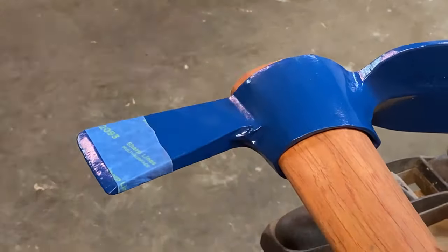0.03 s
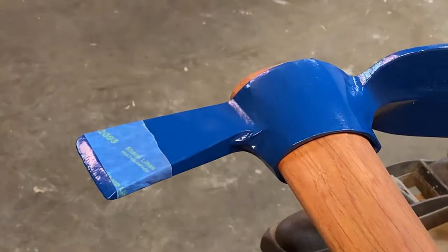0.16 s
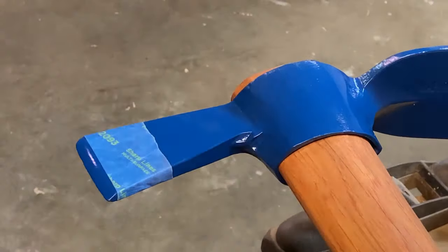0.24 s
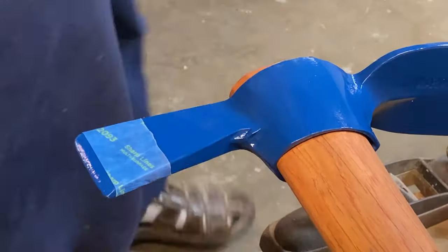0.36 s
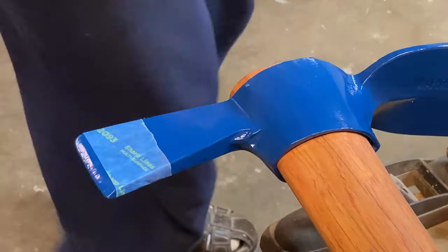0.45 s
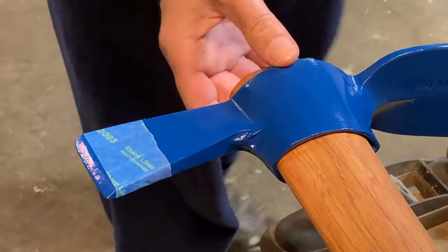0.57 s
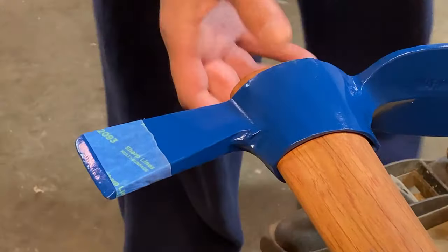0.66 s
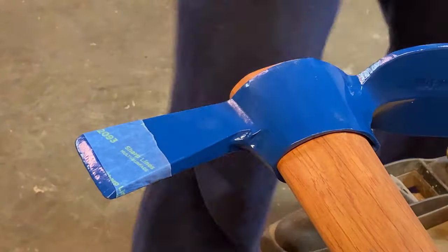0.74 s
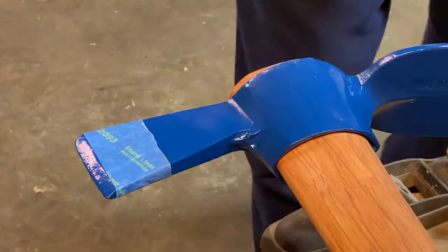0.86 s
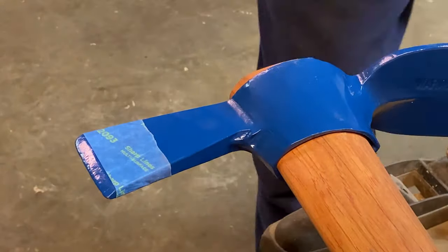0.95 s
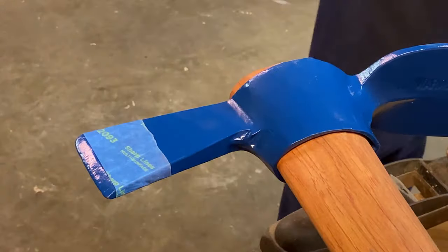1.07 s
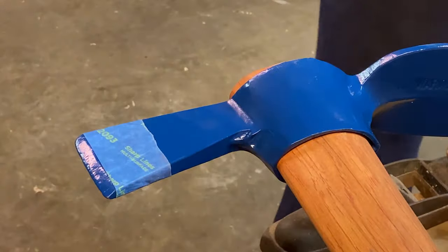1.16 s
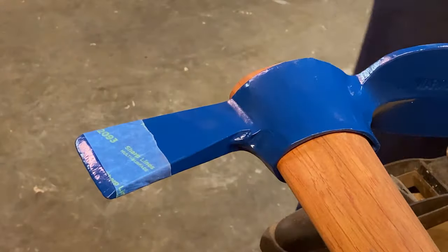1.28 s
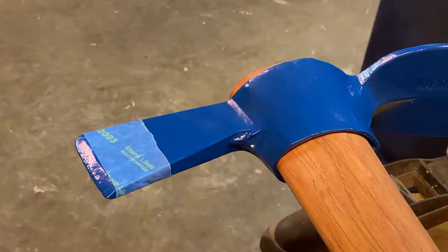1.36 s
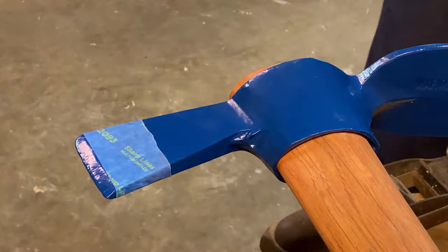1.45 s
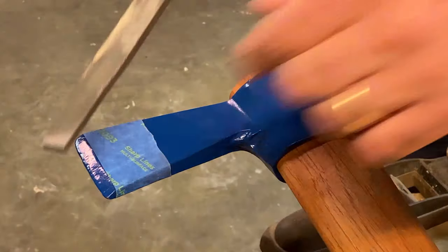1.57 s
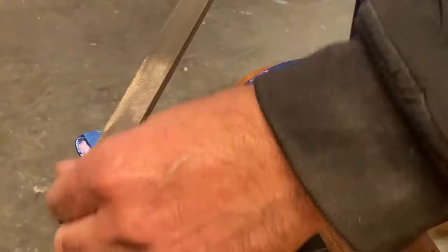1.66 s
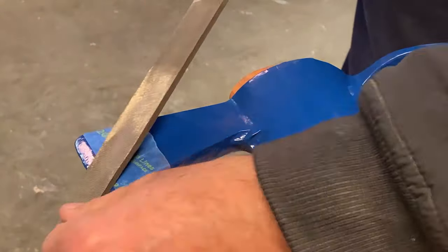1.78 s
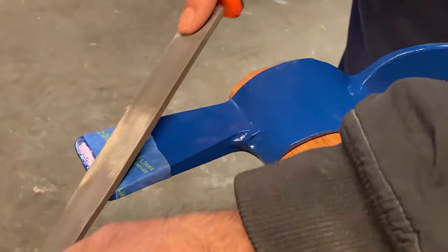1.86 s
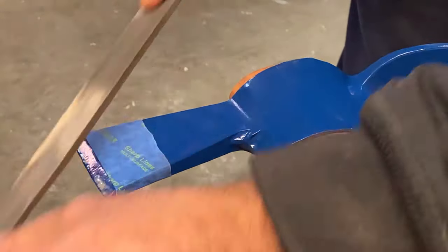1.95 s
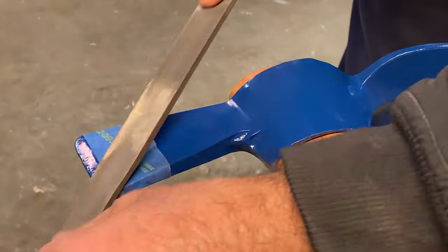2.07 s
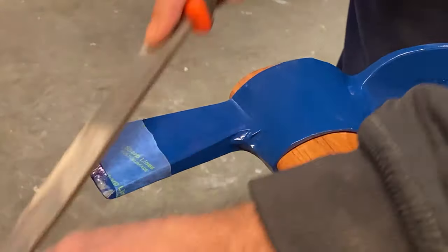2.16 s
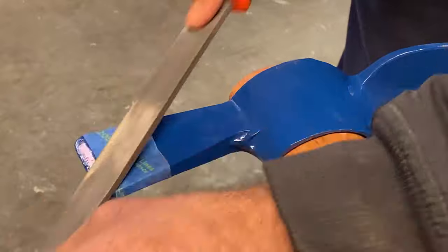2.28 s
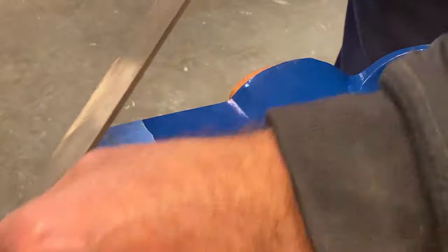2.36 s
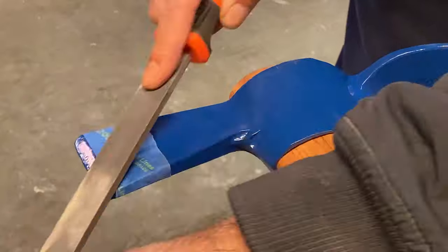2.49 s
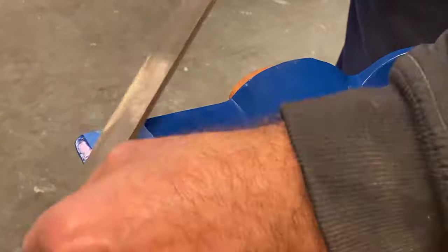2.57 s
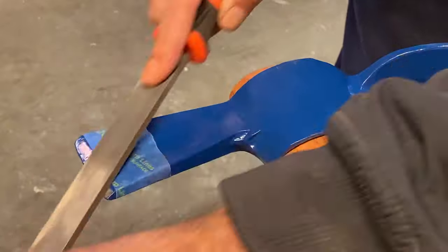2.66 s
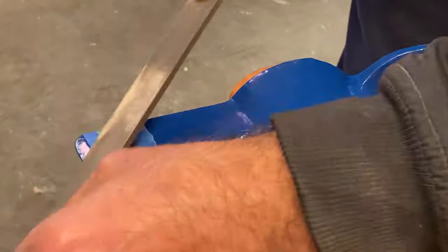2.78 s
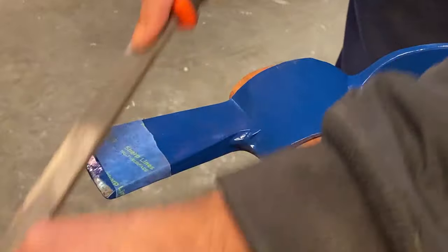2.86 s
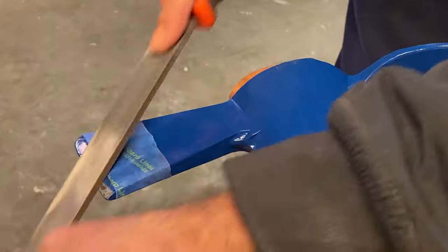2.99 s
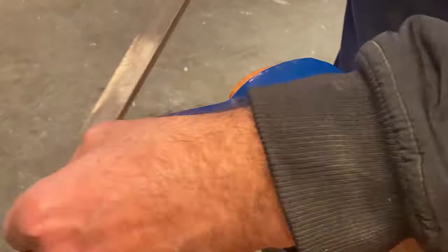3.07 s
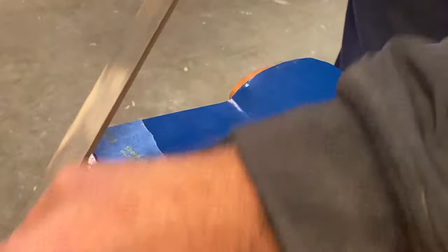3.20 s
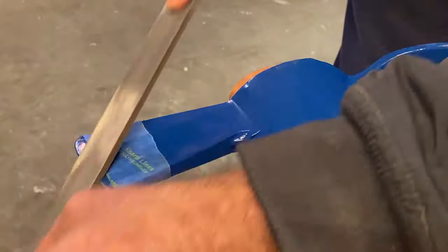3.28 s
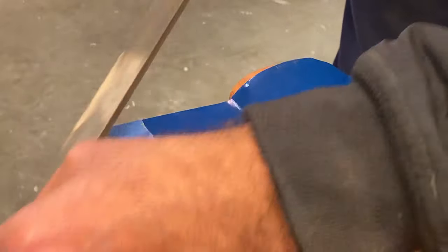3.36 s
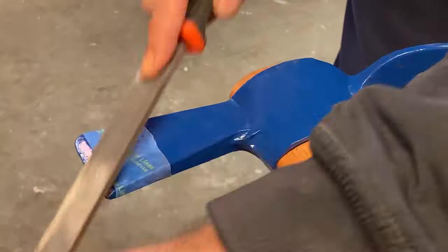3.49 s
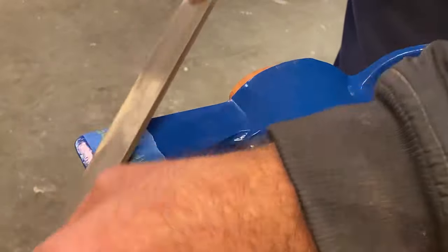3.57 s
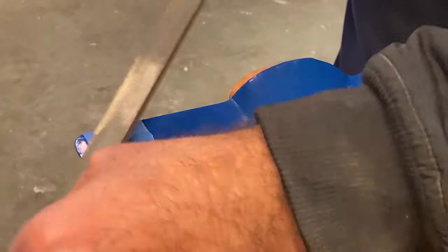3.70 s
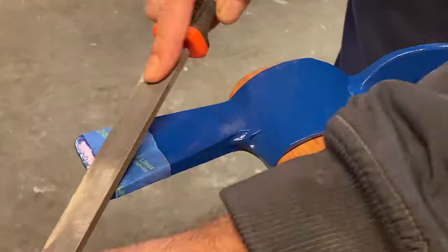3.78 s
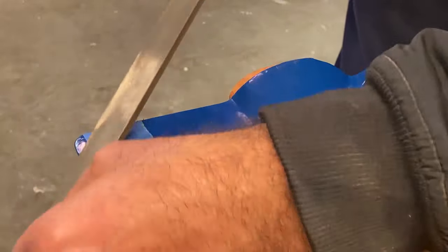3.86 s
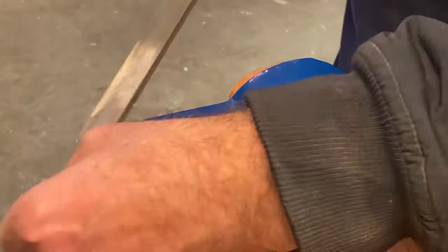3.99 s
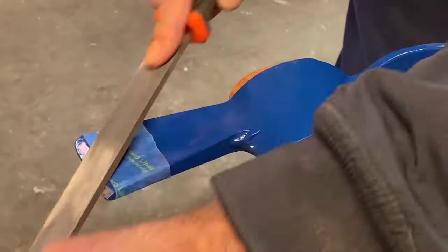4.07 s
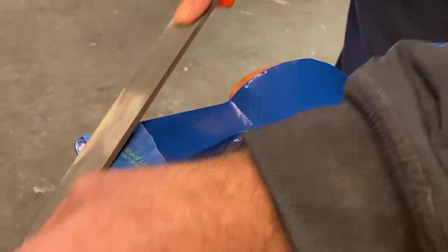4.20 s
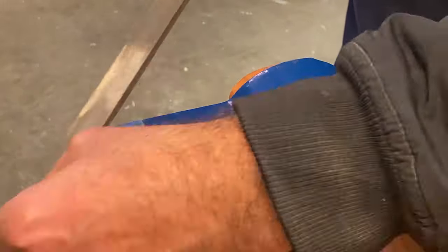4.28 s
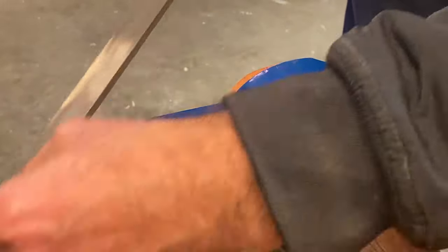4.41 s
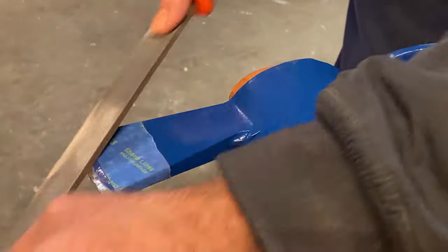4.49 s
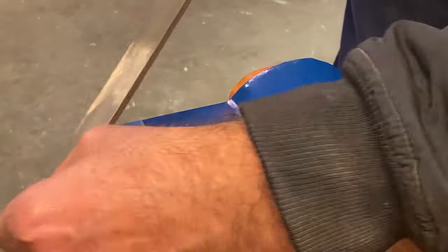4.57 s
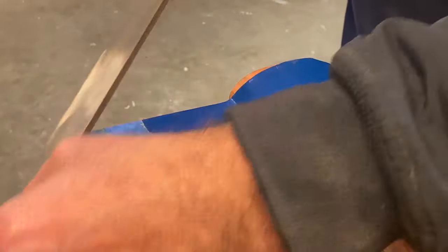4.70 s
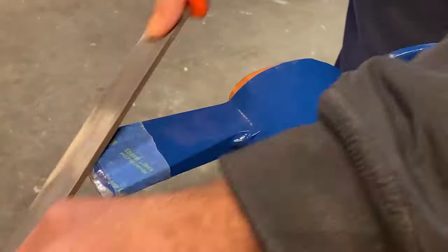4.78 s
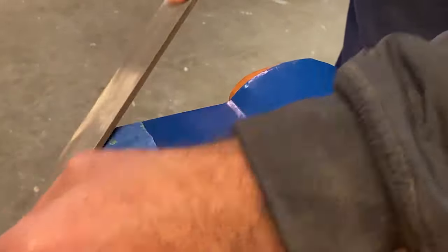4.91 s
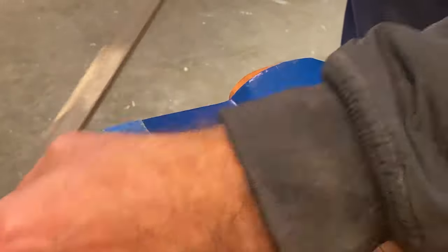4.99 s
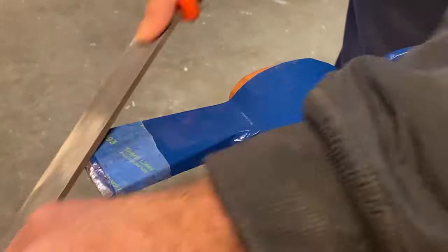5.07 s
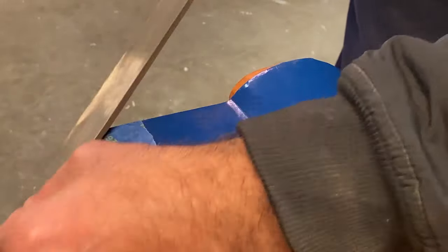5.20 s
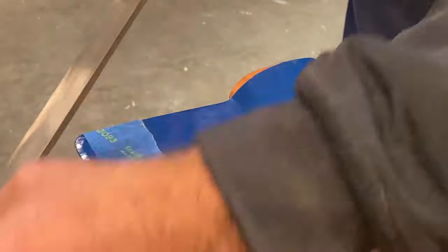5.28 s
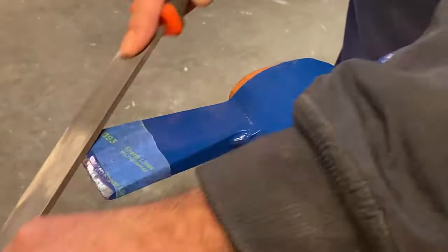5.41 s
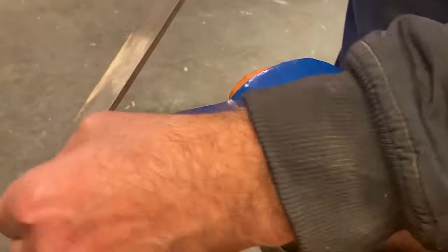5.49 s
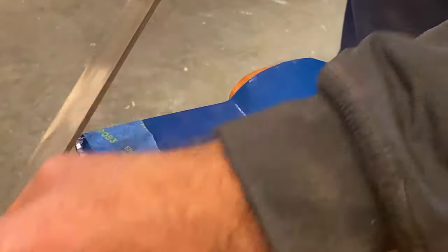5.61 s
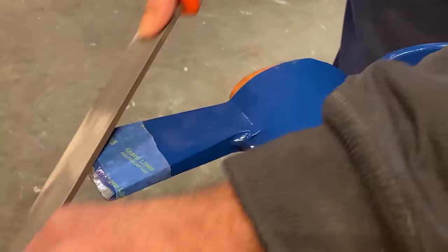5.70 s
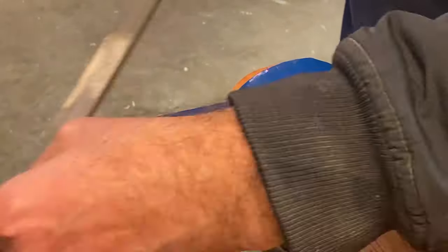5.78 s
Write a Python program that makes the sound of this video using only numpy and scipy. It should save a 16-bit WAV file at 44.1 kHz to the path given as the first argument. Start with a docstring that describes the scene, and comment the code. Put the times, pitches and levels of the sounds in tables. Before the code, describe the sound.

Close stereo microphone in a quiet workshop. For nearly two seconds work clothes swish softly, with scattered footstep bumps and dull knocks. Then a hand file meets a steel tool head: a few tentative touches, then a steady run of about six bright, gritty rasps a second, each starting with a hard metal clack. A sleeve brushes faintly between strokes. Short, faint room tail, low still air.

```python
"""Work clothes rustle first as someone steps up, with dull bumps, beside two close microphone ports.
Then a hand file dresses the steel edge of a mattock in a workshop, about six strokes a second.
Each stroke is noise and ticks through steel modes: a clack on landing, then the rasp of toothed catches
and tearing steel, while friction makes the head thrum and squeal. A sleeve, made of shaped noise, brushes
on each way back. Near scatter, a short room tail and still workshop air, all from noise, lie behind."""
import sys
import numpy as np
from scipy import signal
from scipy.fft import rfft, irfft, next_fast_len
from scipy.io import wavfile
from scipy.ndimage import map_coordinates

SR = 44100
rng = np.random.default_rng(int(sys.argv[2]) if len(sys.argv) > 2 else 0)


def bounce(signal):
    """Save signal as a 16-bit WAV file at the path given by the first command-line argument."""
    frames = np.transpose(np.atleast_2d(signal))
    limited = np.clip(frames, -1, 1)
    pcm = np.round(limited * 32767).astype(np.int16)
    wavfile.write(sys.argv[1], SR, pcm)


N = 257984  # length [samples]
EDGE_HZ = 15900  # upper band limit of the microphone
TAPS = 8192  # length of an impulse response [samples]
HZ = np.fft.rfftfreq(TAPS, 1 / SR)
TREBLE = (HZ > 2000) & (HZ < EDGE_HZ)


def amp(db):
    """Decibels to gain."""
    return 10 ** (np.asarray(db) / 20)


def evened(x):
    """Scales to rms 1."""
    return x / np.sqrt(np.mean(x ** 2) + 1e-20)


def read(points, hz):
    """Reads a table on a log-frequency axis."""
    f, value = np.transpose(points)
    return np.interp(np.log(hz + 1), np.log(f + 1), value)


def add(mix, s, sound):
    """Mixes a sound in at time s."""
    part = mix[max(round(s * SR), 0):][:len(sound)]
    part += sound[:len(part)]


def wander(size, hz):
    """Random line of rms 1 that takes a new value hz times a second, with straight slopes between."""
    at = np.arange(size) * hz / SR
    return evened(np.interp(at, np.arange(size), rng.standard_normal(size)))


def causal(gain, lag_s, lag_hz=800):
    """The impulse response with this gain curve; bending waves are slow, so the lows arrive later."""
    gain = gain / (1 + (HZ / 18500) ** 40)
    # folding the cepstrum gives minimum phase
    cepstrum = irfft(np.log(np.maximum(gain, 1e-5 * gain.max())))
    cepstrum[1:TAPS // 2] *= 2
    cepstrum[TAPS // 2 + 1:] = 0
    delay_s = lag_s / (1 + (HZ / lag_hz) ** 2)
    lag_phase = 2 * np.pi * np.cumsum(delay_s) * HZ[1]
    response = irfft(np.exp(rfft(cepstrum) - 1j * lag_phase))
    return response * np.linspace(1, 0, TAPS) ** .25


# where the file works along the edge:
# (time [s], place of landing [about 0-1], place of the bite [about 0-1])
EDGE_PLACES = [(1.8, 0, 0), (2.7, 0, .05), (3.25, 0.5, 0.66), (3.8, 0.24, .1), (4.25, 0.96, 0.74),
               (5.6, 0.97, 1.06)]


def place_at(s):
    """Where along the edge the file lands and where it bites, at time s."""
    times, landing, bite = np.transpose(EDGE_PLACES)
    return np.interp(s, times, landing), np.interp(s, times, bite)


# modes of head and file over a flat response of 0 dB:
# (frequency [Hz], width [Hz], level at place 0 [dB], level at place 1 [dB])
STEEL_MODES = [(451.5, 16, 16, 13.5), (538.5, 17, 22.5, 24), (836, 61, 15, 18), (905, 60, 13.5, 16.5),
               (1092, 31, 10.5, 10.5), (1265, 42, 14, 17), (1425, 80, 15.5, 13), (2124, 124, 4, 4),
               (2652, 42, 13, 12), (3535, 87, 14.5, 5), (3816, 64, 15.5, 12), (4152, 77, 19, 14),
               (4395, 116, 11, 8), (5070, 116, 7.5, 10.5), (5430, 100, -1, 3), (5510, 93, 8.5, 3.5),
               (6150, 74, 4, 7), (6503, 84, 7.5, 13), (7370, 120, -3, 15), (7410, 95, 11, 16.5),
               (7562, 68, 11.5, 15), (7710, 120, 13.5, 18.5), (8370, 105, 14.5, 18), (8430, 68, 2, 13),
               (8920, 160, 8, 9), (9294, 130, 16.5, 11.5), (9480, 104, 14, 7), (11450, 94, 2, 2),
               (12450, 150, 9, 6), (12776, 79, -4, -1), (13500, 69, 3, 8)]


def steel(colour, place, tilt_db, lag_s=.0065, vary_db=1.5):
    """Response of head and file; the place of contact and the chance of each grip decide which modes speak."""
    hz, width, near_db, far_db = np.transpose(STEEL_MODES)
    mode_db = near_db + place * (far_db - near_db) + vary_db * rng.standard_normal(len(hz))
    peaks = amp(mode_db) ** 2 / (1 + (2 * (HZ[:, None] - hz) / width) ** 2)
    octaves = np.log2(np.maximum(HZ, 350) / 4000)
    gain = np.sqrt(1 + peaks.sum(1)) * amp(read(colour, HZ) + tilt_db * octaves)
    gain = gain * HZ ** 2 / (HZ ** 2 + 90 ** 2)  # so small a body radiates no deep bass
    return causal(gain / np.sqrt(np.mean(gain ** 2 * TREBLE)), lag_s)


# file strokes: (time of landing [s], clack level over its first 10 ms [dB], time of the hardest bite [s],
# rasp level before its trim [dB], time to swell by 10 dB [s], rasp tilt [dB per octave])
FILE_STROKES = [(1.7998, -30.5, 1.82, -62, .02, -4), (1.9451, -45.5, 2.003, -50, .05, -1.9),
                (2.1254, -50, 2.217, -37, .026, 2), (2.3301, -27, 2.399, -39.5, .033, -0.6),
                (2.499, -26, 2.574, -31, .02, 1.3), (2.6793, -31, 2.743, -33.5, .024, 0.95),
                (2.8619, -30.5, 2.923, -34, .035, 0), (3.0244, -29.5, 3.093, -34, .029, 0),
                (3.182, -34, 3.245, -31, .033, 0.1), (3.341, -39.5, 3.405, -27, .042, 0.37),
                (3.4933, -22, 3.556, -30.5, .035, -0.5), (3.6501, -28.5, 3.706, -31.5, .034, 0.4),
                (3.805, -24.5, 3.864, -33, .037, 0), (3.9521, -27.5, 4.012, -32, .036, 0.3),
                (4.1018, -32, 4.169, -31, .033, 0.24), (4.245, -27.5, 4.32, -35, .044, -1.35),
                (4.3953, -27.5, 4.449, -34, .032, -0.47), (4.5419, -26.5, 4.601, -35, .027, -1.13),
                (4.6758, -27, 4.738, -33.5, .025, -1), (4.8266, -26, 4.888, -31, .025, -0.6),
                (4.9726, -25, 5.028, -29, .023, 0.45), (5.1144, -22, 5.173, -31, .033, -.2),
                (5.2739, -21.5, 5.331, -33, .029, -0.8), (5.4274, -22.5, 5.486, -33, .033, -.1),
                (5.587, -23.5, 5.653, -30.5, .03, .5), (5.7387, -26.5, 5.798, -30, .022, -0.6)]
# broad colour of a landing: (frequency [Hz], level [dB])
LANDING_COLOUR = [(100, -39.5), (170, -21), (270, -20), (400, -19.5), (650, -29), (1000, -24.5),
                  (1900, -23), (3000, -16), (4200, -10), (6000, -6.5), (8000, -10), (10500, -7.5),
                  (14500, -4.5), (15800, -2.5)]
# landings softer than FIRM_DB are duller, firmer ones brighter: DULLING [dB per octave for each dB]
FIRM_DB, DULLING = -26, .24


def clacks(chatter=0.81, chatter_s=.0013, skid=0.22, skid_s=0.014, skid_hz=2600):
    """Each landing is a hard tick, a millisecond of chatter and a duller skid of the teeth."""
    out, t = np.zeros(N), np.arange(3072) / SR
    soft = np.exp(-2 * np.pi * skid_hz / SR)
    for s, db, *_ in FILE_STROKES:
        bounces, drag = rng.standard_normal((2, len(t)))
        force = chatter * bounces * np.exp(-t / chatter_s)
        force += skid * signal.lfilter([1 - soft], [1, -soft], drag) * np.exp(-t / skid_s)
        force[0] += 1  # the tick
        response = steel(LANDING_COLOUR, place_at(s)[0], DULLING * (db - FIRM_DB))
        ring = signal.fftconvolve(force, response)
        add(out, s, amp(db) * ring / np.sqrt(np.mean(ring[:SR // 100] ** 2)))
    return out


# broad colour of the cutting teeth: (frequency [Hz], level [dB])
TEETH_COLOUR = [(100, -37.5), (170, -12.5), (270, -12), (380, -3), (490, -12), (650, -17), (1000, -14.5),
                (1900, -10), (3000, -7), (4200, -11.5), (6000, -8), (8000, -10), (10500, -8.5),
                (14500, -1.5), (15800, -8)]
FADE_S = .024  # after the bite the rasp's drive falls by 10 dB in this time


def rasps(level_db=-1, teeth_hz=2300, slowing_s=.09, regular=0.48, grit=0.77, judder=0.44,
          judder_hz=535, uneven_db=1.52, swell_shape=1.37, fade_shape=2.34):
    """Rows of teeth catch the edge ever slower as the push ends; the thrumming head makes them judder."""
    out = np.zeros(N)
    since_start = np.arange(SR // 5) / SR
    size = len(since_start)
    for start, _, s, db, swell_s, tilt_db in FILE_STROKES:
        t = start + since_start - s  # time from the hardest bite
        swell = abs(t / swell_s) ** swell_shape
        fade = abs(t / FADE_S) ** fade_shape
        pressure = amp(-10 * np.where(t < 0, swell, fade))
        rate_hz = teeth_hz * np.clip(1 - t / slowing_s, .3, 1.2) * (1 + .08 * wander(size, 400))
        caught = np.diff(np.floor(np.cumsum(rate_hz) / SR), prepend=0)
        # nearly even rows give a faint falling zip, their unequal bites the grain
        zip_ = regular * (caught - rate_hz / SR)
        teeth = evened(zip_ + caught * rng.uniform(-1.05, 1, size))
        chips = grit * rng.standard_normal(size)  # steel tears between the catches
        turns = np.cumsum(judder_hz * (1 + 0.1187 * wander(size, 201))) / SR
        bite = (1 + judder * np.sin(2 * np.pi * turns)) * amp(uneven_db * wander(size, 225.8))
        force = evened((teeth + chips) * bite) * pressure
        response = steel(TEETH_COLOUR, place_at(s)[1], tilt_db)
        add(out, start, amp(db + level_db) * signal.fftconvolve(force, response))
    return out


def sliding(x, patchy_db=2.6, patch_hz=450, patch_s=.016):
    """The sliding contact passes nodes of the file's bending waves, so bands swell and sink in patches."""
    hz, t, z = signal.stft(x, SR, nperseg=512, noverlap=384)
    chance = rng.standard_normal(z.shape)
    grid = np.meshgrid(hz / patch_hz, t / patch_s, indexing="ij")
    patches = evened(map_coordinates(chance, grid, order=1, mode="wrap"))
    z = z * amp(patchy_db * patches * (hz / (hz + 700))[:, None])  # weaker in the bass
    patchy = signal.istft(z, SR, nperseg=512, noverlap=384)[1][:N]
    return evened(patchy) * np.std(x)


def resonate(x, hz, width):
    """A steep resonance of gain 1 that can follow a moving pitch."""
    turn = np.exp(2j * np.pi * np.cumsum(hz * np.ones(len(x))) / SR)
    r = np.exp(-np.pi * width / SR)
    once = signal.lfilter([1 - r], [1, -r], x / turn)
    return 2 * (turn * signal.lfilter([1 - r], [1, -r], once)).real


# resonances set going by friction in the hard middle of a push; levels are against the untrimmed rasp,
# before its tilt: (frequency [Hz], width [Hz], level at place 0 [dB], level at place 1 [dB],
# time to fade by 10 dB either side, sign ignored [s], time after the bite [s])
FRICTION_TONES = [(450.8, 16, -18.5, -20.5, .05, .008), (536.8, 20, -9.5, -9, 0.02, 0.00198),
                  (7720, 700, -9, -0.5, -0.01, 0.0024)]


def singing(waver=.008, waver_hz=70):
    """Hard biting makes the head thrum on its handle and the edge squeal; bright pushes thrum less."""
    out, t = np.zeros(N), np.arange(-SR // 8, SR // 8) / SR
    for _, _, s, db, _, tilt_db in FILE_STROKES:
        for hz, width, near_db, far_db, fade_s, after_s in FRICTION_TONES:
            noise = rng.standard_normal(len(t))
            tone = resonate(noise, hz * (1 + waver * wander(len(t), waver_hz)), width)
            swell = amp(-10 * (t / fade_s) ** 2)
            place_db = near_db + place_at(s)[1] * (far_db - near_db)
            level_db = db + place_db + tilt_db * np.log2(hz / 4000)
            sound = evened(tone * swell) * np.sqrt(np.mean(swell ** 2))
            add(out, s + after_s + t[0], amp(level_db) * sound)
    return out


# how the ports hear the near blade: (frequency [Hz], left minus right level [dB])
BLADE_BALANCE = [(200, -1), (500, -1.1), (1100, 2), (2500, -5), (3700, 3), (4300, -7), (5200, 2), (6800, 0),
                 (8200, 1), (8900, 7.5), (9800, 1), (12000, 2.5), (13000, 5.5), (15000, 6.5)]
# and (frequency [Hz], phase by which left leads [rad])
BLADE_PHASE = [(100, 0.5), (1200, 0.27), (2500, -1.8), (3500, -1.5), (4200, -1.85), (5200, 1), (6200, -2.3),
               (7000, -0.2), (7800, -1.47), (9900, -1.5), (10500, 1.5), (12500, 1.3), (13500, 3),
               (16000, 1.5)]


def ports(x):
    """The near blade reaches the two microphone ports with different level and phase."""
    size = next_fast_len(N + TAPS)
    hz = np.fft.rfftfreq(size, 1 / SR)
    lean = amp(read(BLADE_BALANCE, hz) / 2) * np.exp(.5j * read(BLADE_PHASE, hz))
    pair = np.array([lean, 1 / lean])
    pair = pair / np.sqrt(np.mean(abs(pair) ** 2, 0))
    return irfft(rfft(x, size) * pair, size)[:, :N]


# steps, handling bumps and, at 2.004 s, a short scrape: (time [s], peak level before its trim [dB],
# resonance [Hz], bass shading before low_db is added [dB])
BUMPS_AND_SCRAPE = [(0.363, -46, 660, -16), (0.46, -47, 400, -7), (0.484, -39.5, 2880, -14),
                    (0.503, -43, 388, -29), (0.578, -42.5, 420, -13), (0.592, -41.5, 3040, -16),
                    (0.793, -30.5, 2380, -14), (0.891, -43.5, 1490, -11.5), (1.043, -49, 386, -12),
                    (1.106, -52.5, 428, -6), (1.127, -51, 412, -8), (1.326, -46.5, 816, -4),
                    (1.401, -39.5, 840, -9), (1.412, -28, 810, -10.5), (1.433, -43, 400, 1),
                    (1.516, -44, 405, -14), (1.944, -28, 840, -12.5), (2.004, -35, 1500, -16)]
# their shared colour: (frequency [Hz], level [dB])
BUMP_COLOUR = [(60, -44), (120, -21), (300, -3.5), (430, 4.5), (620, -3.5), (850, 2.5), (1300, -2),
               (2000, -5.5), (3200, -7), (5000, -6.5), (9000, -13), (15000, -21)]


def bumps_and_scrape(level_db=-1.0, scuff=0.16, t60=0.051, low_db=10, high_db=-6, ring_db=10,
                     ring_width=0.19, lag_s=0.00491):
    """Steps, bumps and a short scrape: each a tick and gritty scuff through one broad resonance."""
    out, t = np.zeros(N), np.arange(TAPS) / SR
    for s, db, hz, bass_db in BUMPS_AND_SCRAPE:
        force = scuff * rng.standard_normal(TAPS) * amp(-60 * t / t60)
        force[0] += 1
        shade_db = read([(900, bass_db + low_db), (1700, 0), (3500, 0), (6500, high_db)], HZ)
        shade_db = shade_db + ring_db / (1 + (2 * (HZ / hz - 1) / ring_width) ** 2)
        sound = signal.fftconvolve(force, causal(amp(read(BUMP_COLOUR, HZ) + shade_db), lag_s))
        add(out, s, amp(db + level_db) * sound / abs(sound).max())
    return out


# how alike sound from all around is at the two ports: (frequency [Hz], likeness [0-1])
PORT_LIKENESS = [(60, 0.95), (150, 0.9), (380, 0.94), (950, 0.82), (2380, 0.42), (5980, 0.32),
                 (15000, 0.076)]


def likeness(hz):
    """Shares of common and separate sound that give the second port its likeness to the first."""
    same = np.clip(read(PORT_LIKENESS, hz), -1, 1)
    return same, np.sqrt(1 - same ** 2)


def diffuse(colour):
    """Coloured noise from all around: alike at both ports in the bass, less so in the treble."""
    size = next_fast_len(N, True)
    hz = np.fft.rfftfreq(size, 1 / SR)
    a, b = rfft(rng.standard_normal((2, size)))
    same, other = likeness(hz)
    spectra = np.array([a, same * a + other * b]) * amp(read(colour, hz))
    return evened(irfft(spectra, size)[:, :N])


# trousers and jacket swish as the worker steps up:
# (time of the peak [s], level before its trim [dB], time to swell or fade by 10 dB [s])
STEP_SWISHES = [(.04, -49, .08), (.155, -60, .09), (.315, -54, .045), (.405, -63.5, .06), (.53, -56, .085),
                (.655, -65, .04), (.86, -57, .11), (.964, -57, .045), (1.058, -65, .03), (1.114, -56, .022),
                (1.2, -63, .035), (1.318, -59, .05), (1.415, -60, .05), (1.535, -61, .06),
                (1.632, -57, .11)]
# the sleeve brushes once on each way back: (time [s], level before its trim [dB])
SLEEVE_LEVELS = [(1.9, -65.5), (2.45, -60.5), (3.5, -58), (4.4, -63), (5.8, -69)]
# colour of the fabric: (frequency [Hz], level [dB])
FABRIC_COLOUR = [(60, -34), (100, -23), (330, 2), (600, -7.5), (1000, -6.5), (1700, -4), (3400, -4.5),
                 (7000, -4), (16000, -12)]
RETURN_AFTER_S, RETURN_S = 0.052, 0.037  # brush peak after the bite; its time to swell or fade by 10 dB


def cloth(level_db=-1, crinkle_db=1.5, folds_db=1.5):
    """Fabric brushes past itself at steps and returns of the arm, with fine crinkles and slower folds."""
    t = np.arange(N) / SR
    brushes = list(STEP_SWISHES)
    for _, _, bite, *_ in FILE_STROKES:
        sleeve_db = np.interp(bite, *np.transpose(SLEEVE_LEVELS))
        brushes.append((bite + RETURN_AFTER_S, sleeve_db, RETURN_S))
    power = np.zeros(N)
    for s, db, fade_s in brushes:
        drop_db = 10 * np.minimum(((t - s) / fade_s) ** 2, 10)
        power += amp(db + level_db - drop_db) ** 2
    fabric = diffuse(FABRIC_COLOUR)
    texture = amp(crinkle_db * wander(N, 1500) + folds_db * wander(N, 90))
    return np.sqrt(power) * evened(fabric * texture)


def nearby(x, delay_s=.001, fade_s=0.0044, lowest_hz=1100, shift_hz=11, count=4):
    """Arm, body and bench scatter the highs to each port differently, shifting as the arm moves."""
    t = np.arange(SR // 30) / SR
    taps = rng.standard_normal((count, 2, len(t))) * (t > delay_s) * np.exp(-t / fade_s)
    taps = signal.sosfilt(signal.butter(2, lowest_hz, "highpass", fs=SR, output="sos"), taps)
    poses = np.array([wander(N, shift_hz) for _ in taps])
    poses = poses / np.linalg.norm(poses, axis=0)
    out = np.zeros((2, N))
    for pose, echo in zip(poses, taps):
        echo = echo / np.linalg.norm(echo[0])
        out += signal.oaconvolve((x * pose)[None], echo, axes=1)[:, :N]
    return out


# decay of the workshop: (frequency [Hz], time to fall by 60 dB [s])
WORKSHOP_T60 = [(200, 0.53), (500, 0.18), (2000, 0.23), (8000, 0.11), (16000, 0.051)]


def room(x, delay_s=.005):
    """Sparse reflections from floor and walls, each band dying at its own speed."""
    size = SR // 2
    taps = rng.standard_normal((2, size)) * (rng.random((2, size)) < .1)
    taps = taps * (np.arange(size) > delay_s * SR)
    hz, t, z = signal.stft(taps, SR, nperseg=256)
    same, other = likeness(hz)
    z = np.array([z[0], same[:, None] * z[0] + other[:, None] * z[1]])
    decay = amp(-60 * t / read(WORKSHOP_T60, hz)[:, None])
    tail = signal.istft(z * decay, SR, nperseg=256)[1]
    return signal.fftconvolve(x[None], tail / np.linalg.norm(tail[0]), axes=1)[:, :N]


# colour of the still workshop air: (frequency [Hz], level [dB])
AIR_COLOUR = [(30, -41), (70, -39), (100, -17), (174, -2.5), (266, -4), (380, 1.5), (600, -15.5),
              (2000, -21), (5000, -21.5), (10000, -28.5), (16000, -37)]


def air(level_db=-66.5):
    """Still workshop air: steady coloured noise from all around."""
    return amp(level_db) * diffuse(AIR_COLOUR)


def scene(scatter_db=-9, file_room_db=-31, bump_scatter_db=-5, bump_room_db=-18):
    """Filing close by, body movements and the quiet room around it."""
    filing = clacks() + sliding(rasps()) + singing()
    handling = bumps_and_scrape()
    early = nearby(amp(scatter_db) * filing + amp(bump_scatter_db) * handling)
    late = room(amp(file_room_db) * filing + amp(bump_room_db) * handling)
    return ports(filing) + handling + early + late + cloth() + air()


def record(dry):
    """The microphone's band limit, a steep low-pass."""
    lowpass = signal.firwin(255, EDGE_HZ, window=("kaiser", 8), fs=SR)
    return signal.oaconvolve(dry, lowpass[None], "same")


dry = scene()
out = record(dry)
bounce(out)
```